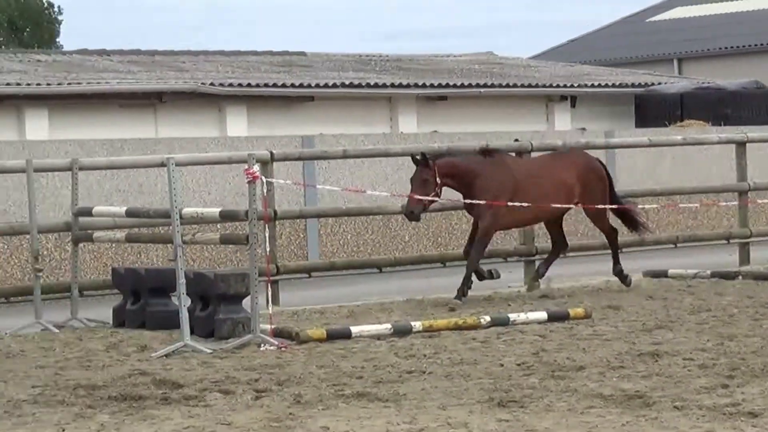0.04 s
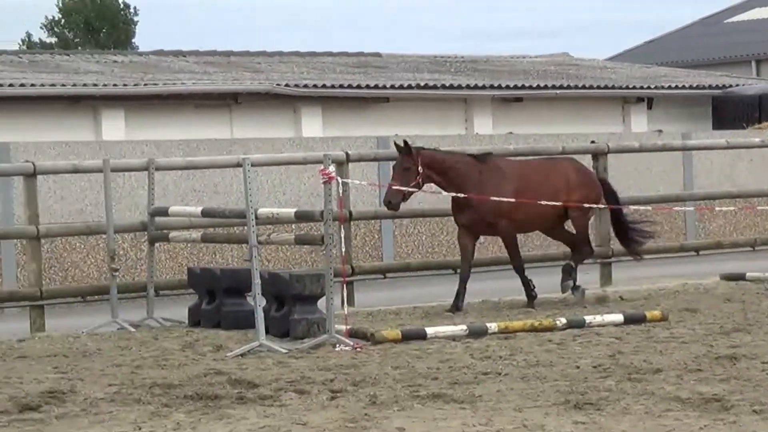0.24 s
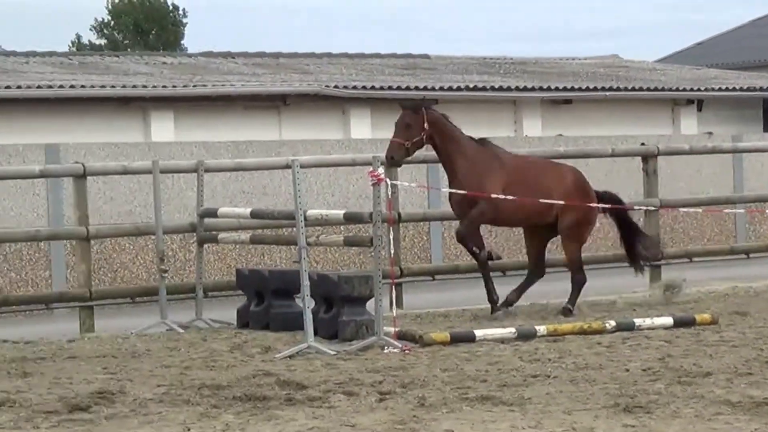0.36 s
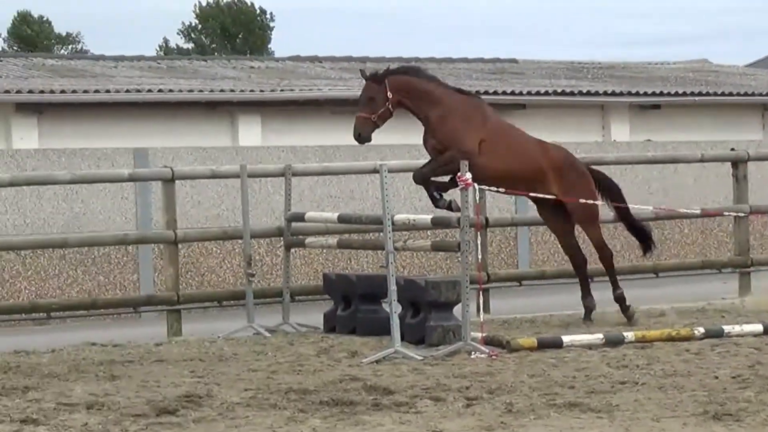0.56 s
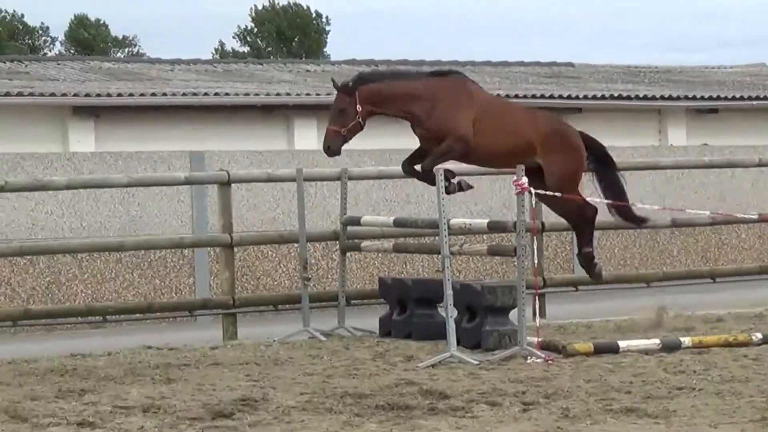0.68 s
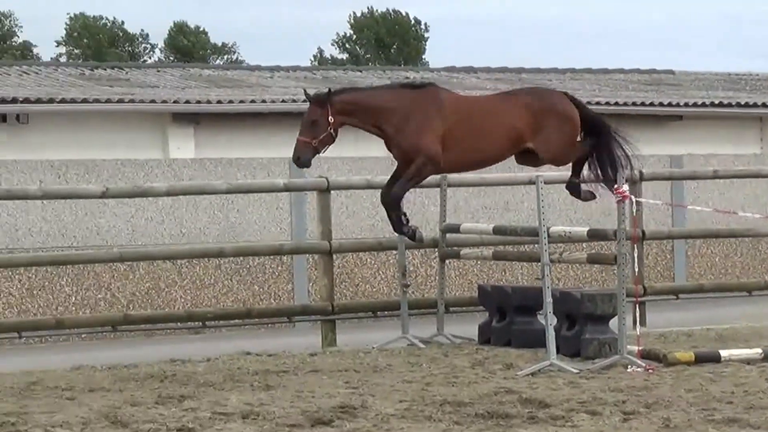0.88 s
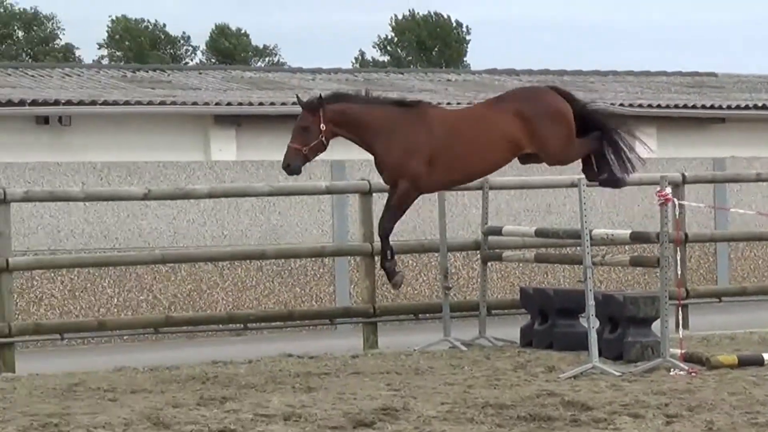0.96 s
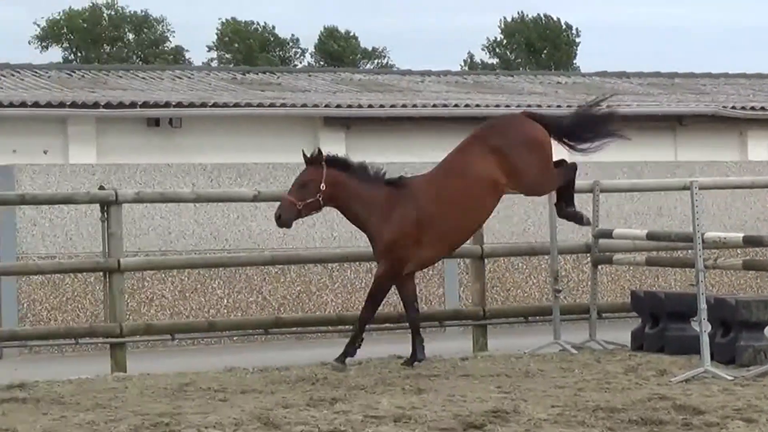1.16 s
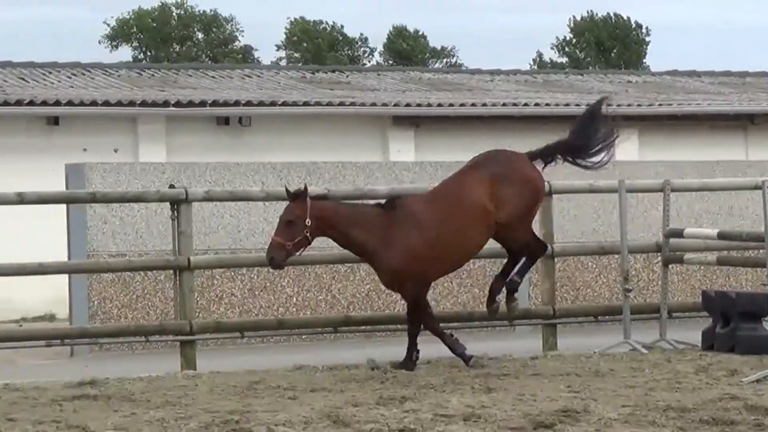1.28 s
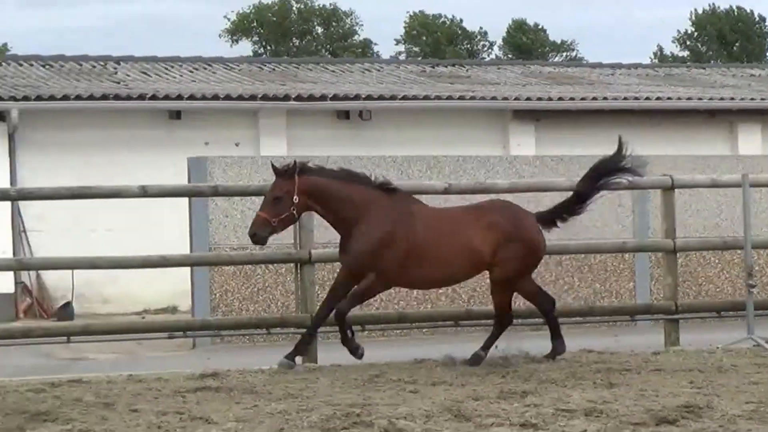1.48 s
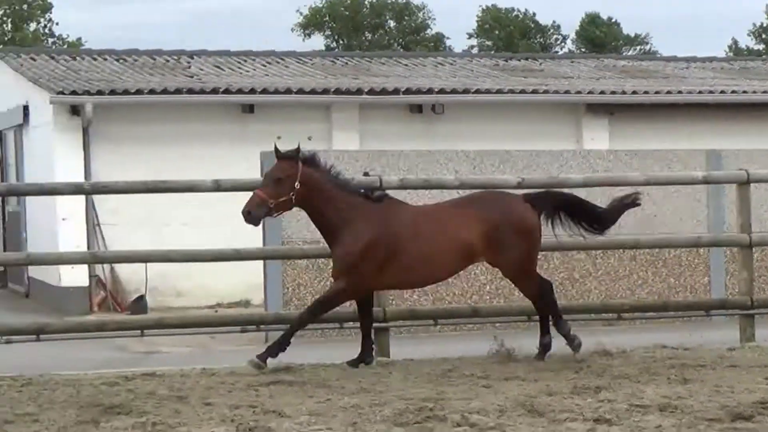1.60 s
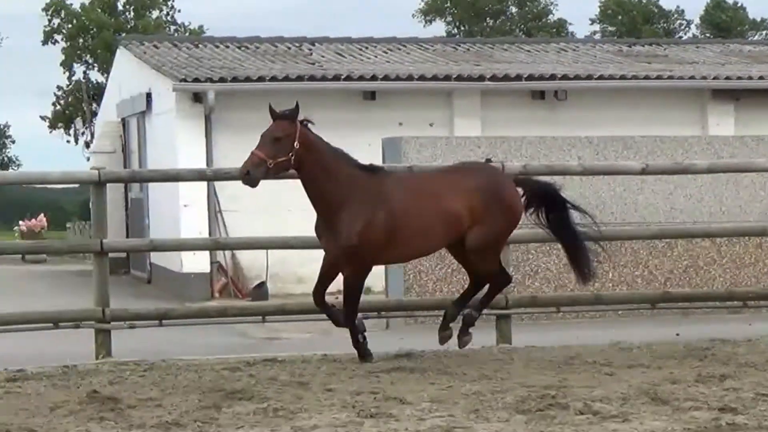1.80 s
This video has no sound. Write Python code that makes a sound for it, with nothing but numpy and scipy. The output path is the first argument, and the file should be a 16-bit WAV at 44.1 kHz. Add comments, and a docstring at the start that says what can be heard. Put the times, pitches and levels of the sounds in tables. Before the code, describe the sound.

Hooves scuffing sand, thudding at take-off and landing more softly, with steady wind outdoors.

```python
"""Low wind and a faint camera whine are present throughout. A horse canters up to a fence in a sandy
outdoor arena: its hooves scrape by stick-slip friction and throw up sand, and grit ticks. At 0.4 s
something squeaks and the horse pushes off with heavy thuds, damped vibrations of the ground that the
stable walls reflect. At 1.2 s it lands farther away; at 1.65 s a small bird chirps once."""
import sys
import numpy as np
from scipy import signal
from scipy.fft import rfft, irfft
from scipy.io import wavfile
from scipy.ndimage import uniform_filter1d

SR = 44100
rng = np.random.default_rng(int(sys.argv[2]) if len(sys.argv) > 2 else 0)


def int16_out(signal):
    """Quantize to a 16-bit WAV file."""
    q = np.round(np.clip(np.atleast_2d(signal).T, -1, 1) * 32767)
    wavfile.write(sys.argv[1], SR, q.astype(np.int16))


N = 81585
BAND_EDGE_HZ = 16100

# Spectra of the sources. Each row: frequency in Hz, relative level in dB.
WIND_SPECTRUM = [(20, -15), (55, -1.5), (90, -6), (160, -2.5), (290, -3), (400, -12.5), (750, -9.5),
                 (1600, -15), (2600, -26), (3600, -25.5), (6500, -30.5), (11000, -32), (15000, -39.5)]
CHURN_SPECTRUM = [(25, -38.5), (70, -20.5), (120, 9.5), (200, 1.5), (300, 1.5), (420, -3.5), (650, -5),
                  (1000, -19), (3000, -37), (15000, -70)]
TICK_SPECTRUM = [(200, -27), (1400, -4.5), (2500, -0.5), (3800, -1.5), (5500, -4), (8000, -5),
                 (11000, -5.5), (15000, -28)]
SCUFF_SPECTRUM = [(100, -12.5), (500, -19), (750, -11.5), (980, -2.5), (1300, -3.5), (1700, -5),
                  (2300, -16), (4000, -24.5), (9000, -30.5), (15000, -36.5)]
CLACK_SPECTRUM = [(100, 4), (500, 9.5), (900, -2), (1400, 2), (2200, -3.5), (3000, 2), (4100, 1.5),
                  (5400, -16), (6500, -16), (7500, -4.5), (9000, -8.5), (10000, -16.5), (13000, -23),
                  (15000, -38)]
SPRAY_SPECTRUM = [(100, -16), (400, -6.5), (720, 6.5), (1100, -2), (2000, -3), (4000, -7.5), (7000, -11.5),
                  (11000, -13.5), (15000, -23)]
CRUNCH_SPECTRUM = [(60, 5.5), (250, -14), (600, 4.5), (1000, -8.5), (1600, -10), (2600, -15), (4000, -30),
                   (8000, -36), (15000, -47)]
# Likeness of the wind in the two channels. Each row: frequency in Hz, correlation.
WIND_COHERENCE = [(30, 0.97), (200, 1), (400, 0.9), (800, 0.63), (1500, 0.66), (3000, 0.71), (8000, 0.91),
                  (15000, 1)]
# Moving sand. Each row: start in seconds, level in dB, rise and fall in seconds, pan in dB.
FOOTING_CHURNS = [(.0, -48, 0.0037, 0.36, 1.5), (.13, -40, 0.029, 0.4, 0.5),
                  (.41, -31.5, 0.055, 0.073, -16.5), (1.211, -43.5, 0.007, 0.13, 1.5),
                  (1.35, -54, 0.043, 0.24, 5), (1.44, -45.5, 0.081, 0.089, 2)]  # dull shifting under the strides
HOOF_SCUFFS = [(.162, -36.5, 0.021, 0.054, -3), (.246, -40, 0.015, 0.011, 6),
               (.505, -37.5, 0.018, 0.091, -1), (.635, -47.5, 0.0034, 0.014, -21),
               (1.210, -51.5, 0.024, 0.047, 4), (1.352, -45, .008, 0.032, 2),
               (1.388, -43, 0.0023, 0.006, 0)]  # hooves dragging
SAND_SPRAYS = [(.244, -45.5, 0.0049, 0.19, 1), (.59, -51, 0.043, 0.12, 0), (1.21, -51, 0.01, 0.063, 0),
               (1.36, -55.5, 0.067, 0.25, 1), (1.735, -44, 0.042, 0.12, 0)]  # sand thrown up and falling back
# Grit striking. Each row: start in seconds, level in dB, decay in seconds.
GRIT_TICKS = [(0.062, -44, 0.0014), (.0725, -39.5, 0.00056), (0.2552, -32, 0.0016), (.2650, -37, 0.0016),
              (0.299, -33.5, 0.00086), (.3590, -37.5, 0.0025), (.5985, -38, 0.0011), (0.6267, -34, 0.0014),
              (.6500, -32.5, 0.00058), (0.6669, -40, 0.00099), (.6835, -34, 0.00032),
              (1.2567, -47.5, 0.0044), (1.3613, -37, 0.0004), (1.3717, -46, 0.0015), (1.3769, -25, 0.00035),
              (1.4545, -36, .0012), (1.604, -41.5, 0.00044), (1.6268, -36.5, 0.00043),
              (1.742, -37, 0.00079)]
# A stone grazes a hoof, then snaps off it. Each row: start in seconds, level in dB, tilt in dB/octave.
STONE_CLACKS = [(0.2409, -15, 13), (0.2435, 1, 1)]
# Resonances of dragging hooves and, in the last row, of sand spraying at the close. Each row: start in seconds,
# frequency and bandwidth in Hz, level in dB, rise and fall in seconds.
SCRAPE_MODES = [(.07, 706, 160, -47.5, 0.059, .04), (.165, 980, 190, -35, 0.033, .03),
                (.17, 1360, 330, -44.5, 0.023, 0.053), (.168, 1688, 270, -33.5, 0.015, 0.009),
                (1.76, 725, 170, -45.5, 0.051, .08)]
# Gliding tones. Each row: start and length in seconds, level in dB, first and last pitch in Hz.
SQUEAK_GLIDES = [(.406, 0.037, -50.5, 2800, 2930), (.521, 0.019, -34, 2750, 2620),
                 (.545, 0.039, -46.5, 2820, 2930), (.548, 0.072, -50, 3330, 3420),
                 (.589, 0.012, -36.5, 3555, 3360), (.641, 0.0077, -37.5, 2520, 3380),
                 (.644, 0.0133, -38, 3520, 2860), (.722, 0.042, -57.5, 5820, 5600)]
BIRD_GLIDES = [(1.650, 0.061, -52.5, 4330, 4246), (1.670, .024, -48.5, 4460, 3610),
               (1.690, 0.021, -55, 4120, 4040), (1.712, 0.049, -61, 3310, 3260),
               (1.712, 0.035, -53.5, 4560, 4500), (1.742, 0.017, -50.5, 3700, 3710)]
# Hoof blows. Each row: start in seconds, level in dB, pitch in Hz, 60 dB decay time in seconds,
# crunch in dB relative to the blow, pan in dB.
HOOF_BLOWS = [(0.409, -9, 210, 0.0096, -24, -1), (0.4265, -26, 222, .025, -5.5, 3),
              (.4440, -19, 230, .025, -11, 2), (0.4565, -4, 170, 0.032, -11.5, -0.5),
              (0.4753, -12, 186.6, 0.029, -21, -19), (0.4897, -7, 288, .02, -10.5, 2.5),
              (0.5114, -23, 334, 0.071, -20, -15.5), (0.5226, -31, 314, 0.028, -15, 3),
              (0.5716, -14.5, 161, 0.058, -21, -10), (0.5998, -22, 200, 0.051, -32, -12.5),
              (0.6436, -38, 193, 0.033, -33, 3), (0.6727, -22, 190, 0.036, -33, -2),
              (1.2140, -31.5, 240, .03, -5.5, 3), (1.2255, -22.5, 112, 0.042, -15, -1.5),
              (1.2453, -30, 148, .025, -14, 0), (1.256, -28.5, 147, 0.028, -11, 0),
              (1.2857, -30, 290, 0.03, -21, 0), (1.3539, -31, 161, 0.047, -6.5, -2),
              (1.429, -29.5, 129, 0.03, -16, 0), (1.4520, -38, 161, 0.076, -29, 3),
              (1.5024, -40, 323, 0.02, -5, -2), (1.6075, -23.5, 159, 0.013, -15.5, 0)]
# Reverberation of the yard. Each row: frequency in Hz, 60 dB decay time in seconds.
YARD_T60 = [(100, 0.41), (260, .75), (700, 0.26), (1800, 0.54), (8000, 0.32)]
# Stereo width. Each row: frequency in Hz, gain of the left-right difference in dB.
SAND_WIDTH = [(100, -36), (200, -39), (400, -18), (800, -7), (1500, -9.5), (6000, -18), (12000, -26)]
CAMERA_WIDTH = [(100, -8), (7000, 5.5), (9500, -5.5), (12000, -10), (15000, -9)]


def amp(db):
    """Converts decibels to an amplitude ratio."""
    return 10 ** (np.asarray(db) / 20)


def unit_rms(x):
    """Normalises a signal to unit mean power."""
    return x / np.sqrt(np.mean(x ** 2) + 1e-20)


def read(points, hz):
    """Interpolates a table on a log-frequency axis."""
    f, value = np.transpose(points)
    return np.interp(np.log(hz + 1), np.log(f), value)


def add(mix, start, sound, pan_db=0):
    """Places a sound in time and pans it by level difference, left minus right."""
    part = mix[:, round(start * SR):][:, :sound.shape[-1]]
    part += amp([[pan_db / 2], [-pan_db / 2]]) * sound[..., :part.shape[1]]


def colour(x, points, size=2048):
    """Imposes a spectrum through a minimum-phase filter of unit energy."""
    log_gain = np.log(amp(read(points, abs(np.fft.fftfreq(size, 1 / SR)))))
    taps = np.fft.ifft(np.exp(np.conj(signal.hilbert(log_gain)))).real[:size // 2]
    return signal.fftconvolve(x, taps / np.linalg.norm(taps))[:len(x)]


def shape(x, points):
    """Applies a gain curve with zero phase shift."""
    gain = amp(read(points, np.fft.rfftfreq(2 * len(x), 1 / SR)))
    return irfft(rfft(x, 2 * len(x)) * gain)[:len(x)]


def widen(mid, side, width):
    """Forms left and right as a sum and a difference."""
    return np.array([mid + width * side, mid - width * side]) / np.sqrt(1 + width ** 2)


def swell(t, rise, fall):
    """An envelope of linear growth and exponential decay."""
    return np.minimum(t / rise, 1) * np.exp(-np.maximum(t - rise, 0) / fall)


def wind():
    """Moving air gives low, partly coherent noise whose level drifts slightly in time and frequency."""
    frames, hz = N // 256 + 5, np.fft.rfftfreq(1024, 1 / SR)
    a, b, c, d, patches = rng.standard_normal((frames, len(hz), 5)).T
    left, independent = a + 1j * b, c + 1j * d
    patches = uniform_filter1d(patches, size=8, axis=0)
    patch_db = 1.44 * unit_rms(uniform_filter1d(patches, size=12, axis=1))
    gust_db = 0.25 * unit_rms(uniform_filter1d(rng.standard_normal(frames), size=25))
    coherence = read(WIND_COHERENCE, hz)[:, None]
    right = coherence * left + np.sqrt(1 - coherence ** 2) * independent
    spectra = np.array([left, right]) * amp(read(WIND_SPECTRUM, hz)[:, None] + patch_db + gust_db)
    air = signal.istft(spectra, nperseg=1024, noverlap=768)[1][:, :N]
    return amp(-46) * unit_rms(air)


def grains(n, per_second=9000, spread_db=3.5):
    """Independent collisions of sand grains form shot noise: dense impulses of uneven size."""
    size = amp(spread_db * np.minimum(rng.exponential(1, n), 4))
    return unit_rms(size * rng.standard_normal(n) * (rng.random(n) < per_second / SR))


def sand(rows, spectrum):
    """Grain collisions superpose into swells of noise, with the bass coherent in both channels."""
    out, t = np.zeros((2, N)), np.arange(SR) / SR
    for start, db, rise, fall, pan_db in rows:
        mid, side = (colour(grains(len(t)) * swell(t, rise, fall), spectrum) for _ in range(2))
        add(out, start, amp(db) * widen(mid, shape(side, SAND_WIDTH), 0.95) * np.sqrt(2), pan_db)
    return out


def stones(sweep_s=0.000887, scatter_s=0.00083):
    """Brief impacts radiate broadly: grit ticks, and a stone snaps with its treble ahead of its body."""
    out, t = np.zeros((2, N)), np.arange(SR // 50) / SR
    for start, db, decay in GRIT_TICKS:
        burst = rng.standard_normal(len(t)) * np.exp(-t / decay)
        add(out, start, amp(db) * colour(burst, TICK_SPECTRUM))
    hz = np.fft.rfftfreq(len(t), 1 / SR)
    group_delay = sweep_s * (1 - hz / BAND_EDGE_HZ)
    phase = -2 * np.pi * np.cumsum(group_delay) * hz[1]
    for start, db, tilt in STONE_CLACKS:
        snap = irfft(amp(read(CLACK_SPECTRUM, hz) + tilt * np.log2(hz + 1)) * np.exp(1j * phase))
        snap = snap / np.linalg.norm(snap) * (t < t[-1] / 2)
        scatter = colour(rng.standard_normal(len(t)) * np.exp(-t / scatter_s), TICK_SPECTRUM)
        add(out, start, amp(db) * widen(snap, scatter, amp(-26)), pan_db=-4)
    return out


def scrape():
    """Stick-slip friction of a hoof in packed sand, and sand spraying at the close, drive damped resonances: a
    half-pitched rasp."""
    out, t = np.zeros((2, N)), np.arange(SR // 3) / SR
    for start, hz, bandwidth, db, rise, fall in SCRAPE_MODES:
        ring = np.sin(2 * np.pi * hz * t) * t * np.exp(-np.pi * bandwidth * t)
        rasps = (signal.fftconvolve(grains(2 * len(t)), ring, "valid") for _ in range(2))
        mid, side = (unit_rms(rasp[:len(t)]) for rasp in rasps)
        add(out, start, amp(db) * swell(t, rise, fall) * widen(mid, side, 0.15), pan_db=-3.7)
    return out


def glides(rows, jitter, skew, pan_db):
    """Random frequency modulation roughens gliding sines; a skew below one makes each peak early."""
    out, t = np.zeros((2, N)), np.arange(SR // 16) / SR
    for start, length, db, first_hz, last_hz in rows:
        progress = np.minimum(t / length, 1)
        wobble = unit_rms(uniform_filter1d(rng.standard_normal(len(t)), size=40))
        hz = (first_hz + (last_hz - first_hz) * progress) * (1 + jitter * wobble)
        tone = np.sqrt(2) * np.sin(2 * np.pi * np.cumsum(hz) / SR)
        envelope = np.sin(np.pi * progress ** skew) ** 2
        add(out, start, amp(db) * envelope * tone, pan_db)
    return out


def squeaks():
    """Strong pitch jitter broadens short tones into rough squeaks at the take-off."""
    return glides(SQUEAK_GLIDES, jitter=0.04, skew=0.42, pan_db=-3)


def hooves(bend=0.23, bend_s=0.0036, low_cut_hz=85):
    """Each impact excites a damped vibration of the ground and crushes the sand beneath the hoof."""
    out, t = np.zeros((2, N)), np.arange(SR // 8) / SR
    attack = 1 - np.exp(-t / 0.00069)
    pressure = (1 - np.exp(-t / 0.00071)) * np.exp(-t / 0.0059)
    for start, db, hz, t60, crunch_db, pan_db in HOOF_BLOWS:
        cycles = hz * (t + bend * bend_s * (1 - np.exp(-t / bend_s)))  # starts sharp, then settles
        ground = np.sin(2 * np.pi * cycles) * attack * np.exp(-np.log(1000) * t / t60)
        mid, side = (colour(grains(len(t)) * pressure, CRUNCH_SPECTRUM) for _ in range(2))
        crunch = amp(crunch_db) * widen(mid, side, 0.12)
        add(out, start, amp(db) * (ground + crunch), pan_db)
    return signal.lfilter(*signal.butter(2, low_cut_hz, "high", fs=SR), out)


def yard(x, buildup_s=0.055):
    """Reflections from stable walls and fences form a diffuse tail that lasts longest near 260 Hz."""
    t = np.arange(SR) / SR
    echoes = rng.standard_normal((2, SR)) * (1 - np.exp(-t / buildup_s))
    hz, frame_s, spectra = signal.stft(echoes, SR, nperseg=256)
    fade = np.exp(-np.log(1000) * frame_s / read(YARD_T60, hz)[:, None])
    mid, side = signal.istft(spectra * fade, SR, nperseg=256)[1]
    bass_energy = np.sum((echoes[0] * np.exp(-np.log(1000) * t / YARD_T60[0][1])) ** 2)
    tail = widen(mid, side, 0.37) / np.sqrt(bass_energy)
    return signal.fftconvolve(x, tail, axes=1)[:, :N]


def bird():
    """Nearly pure gliding whistles overlap into one chirp of a small bird."""
    return glides(BIRD_GLIDES, jitter=0.014, skew=0.71, pan_db=0)


def scene():
    """Direct sound, its reflections and the wind add by superposition."""
    footing = hooves() + scrape() + sand(HOOF_SCUFFS, SCUFF_SPECTRUM)
    footing += sand(SAND_SPRAYS, SPRAY_SPECTRUM) + sand(FOOTING_CHURNS, CHURN_SPECTRUM)
    direct = footing + squeaks() + bird()
    grit = stones()
    reflections = yard(amp(-11.5) * direct + amp(-20.5) * grit)
    return direct + grit + reflections + wind()


def record(dry, whine_hz=15625, whine_db=-63, pulse_hz=50):
    """The camera filters the left-right difference, adds its thin, pulsed whine and limits the band."""
    mid, side = dry.mean(0), shape((dry[0] - dry[1]) / 2, CAMERA_WIDTH)
    t = np.arange(N) / SR
    gate = (t * pulse_hz) % 1 > 0.18  # the whine pauses for this share of each cycle
    whine = amp(whine_db) * np.sqrt(2) * np.sin(2 * np.pi * whine_hz * t) * gate
    out = np.array([mid + side, mid - side]) + whine
    low_pass = signal.firwin(511, BAND_EDGE_HZ, window=("kaiser", 9), fs=SR)
    return signal.oaconvolve(out, low_pass[None], "same")


dry = scene()
out = record(dry)
int16_out(out)
```